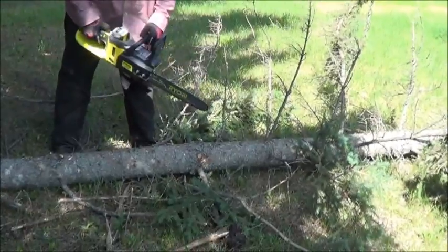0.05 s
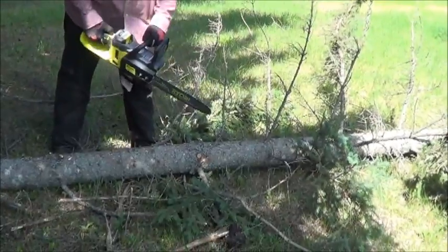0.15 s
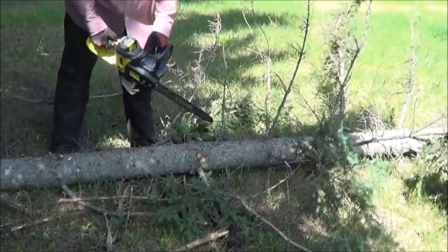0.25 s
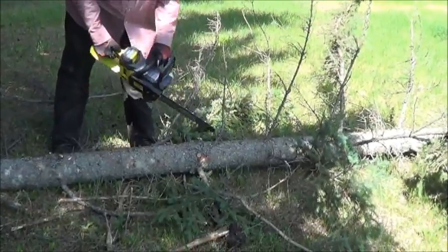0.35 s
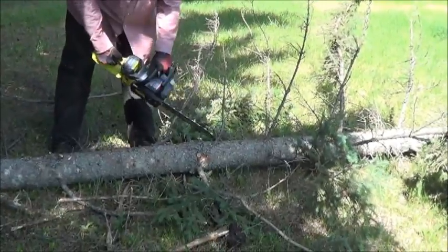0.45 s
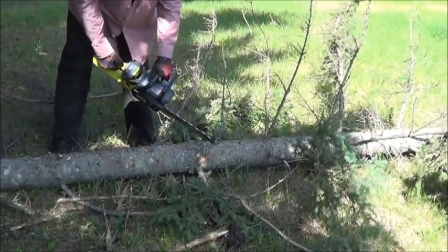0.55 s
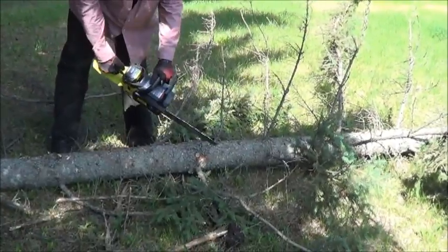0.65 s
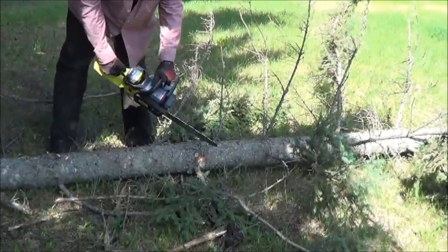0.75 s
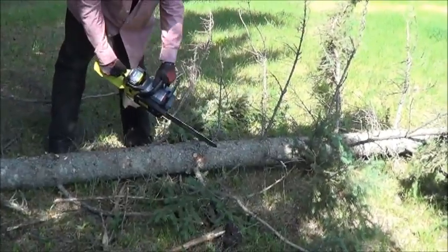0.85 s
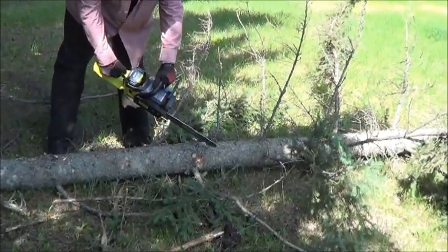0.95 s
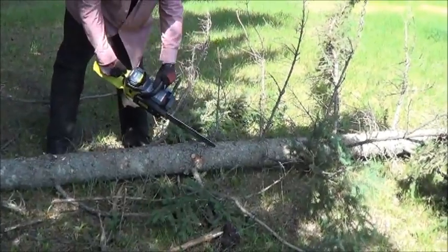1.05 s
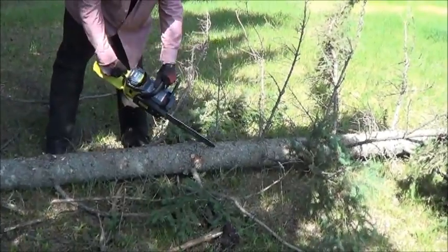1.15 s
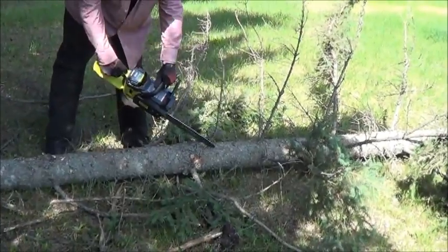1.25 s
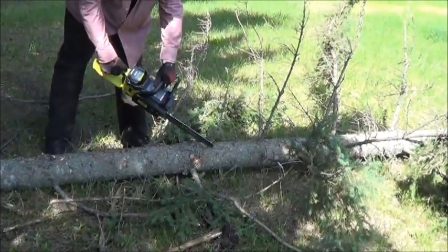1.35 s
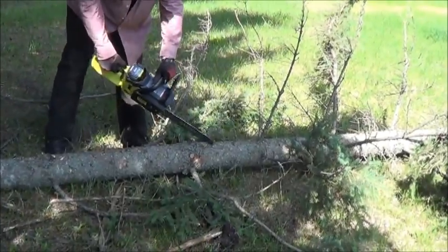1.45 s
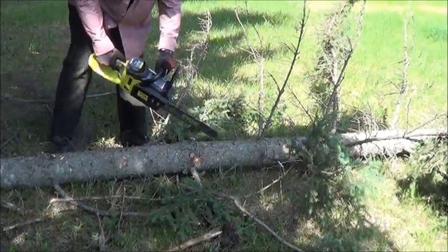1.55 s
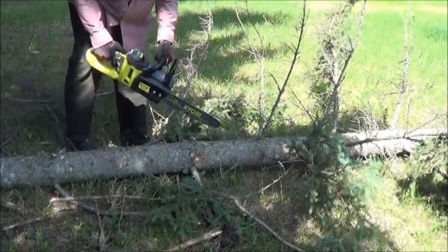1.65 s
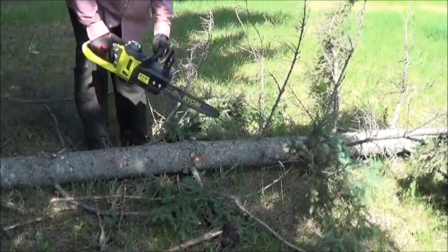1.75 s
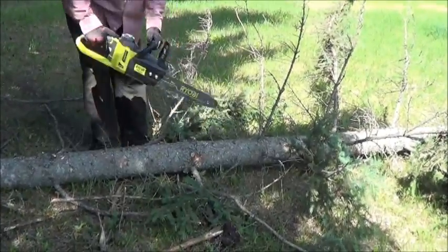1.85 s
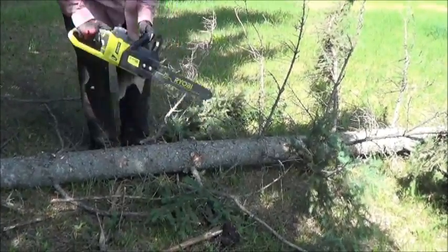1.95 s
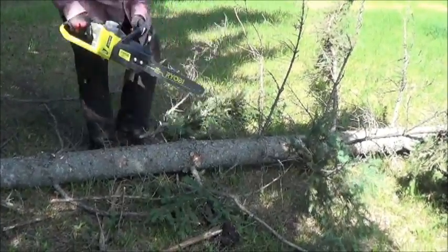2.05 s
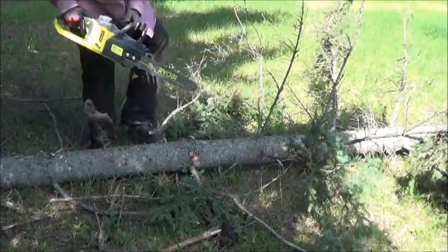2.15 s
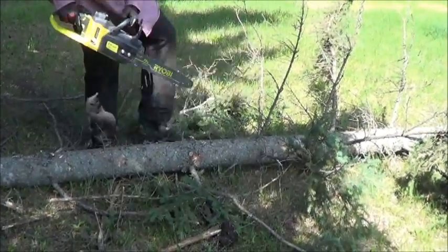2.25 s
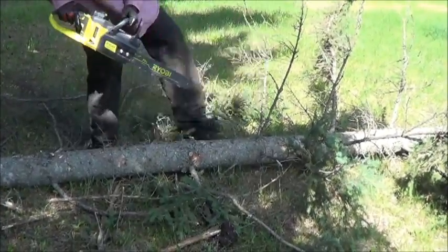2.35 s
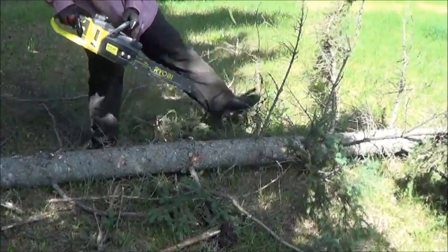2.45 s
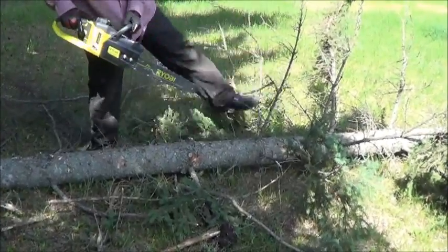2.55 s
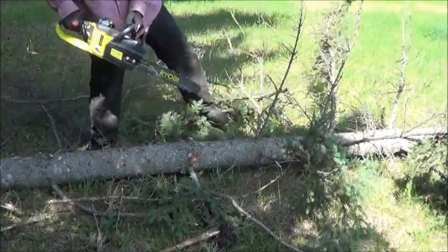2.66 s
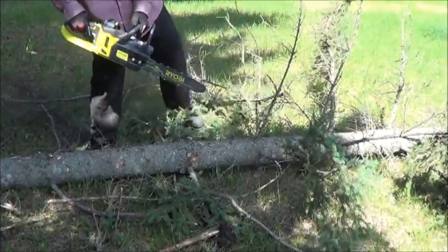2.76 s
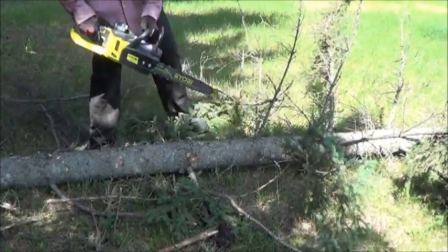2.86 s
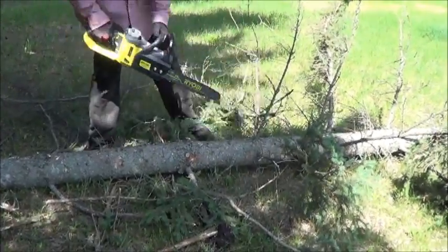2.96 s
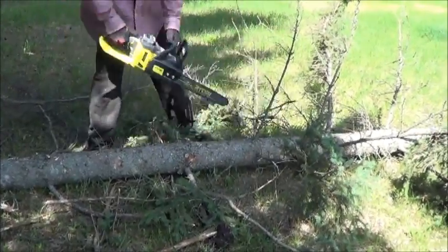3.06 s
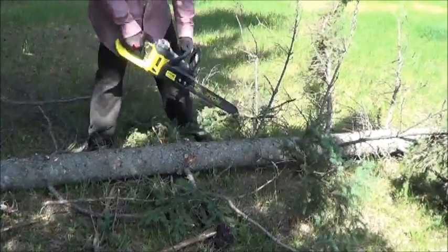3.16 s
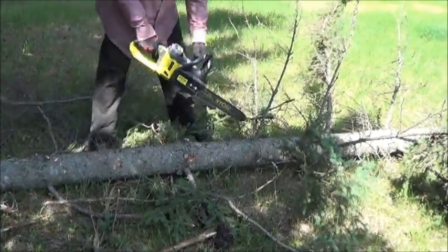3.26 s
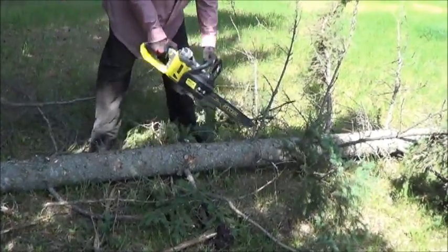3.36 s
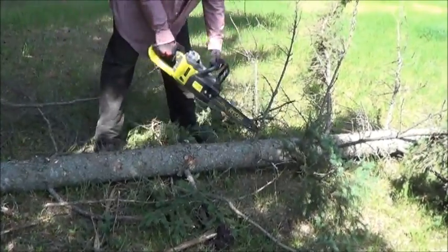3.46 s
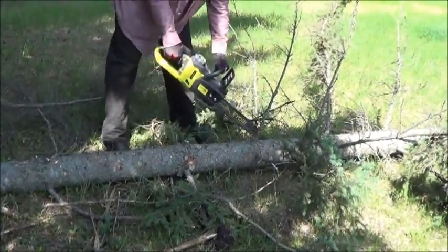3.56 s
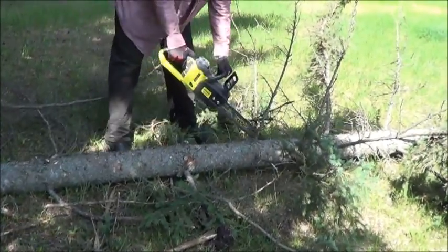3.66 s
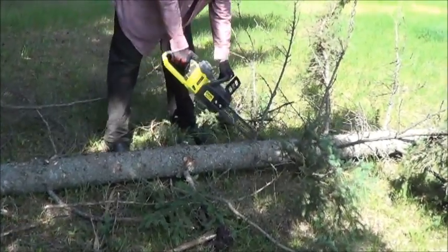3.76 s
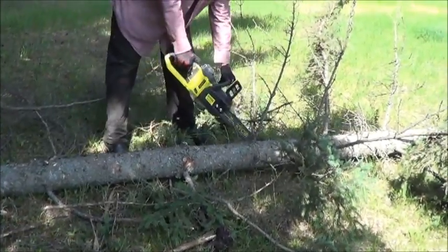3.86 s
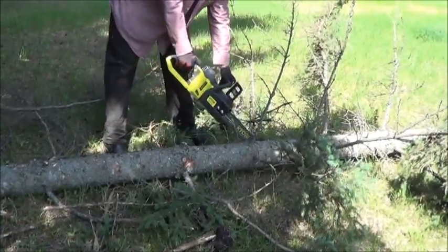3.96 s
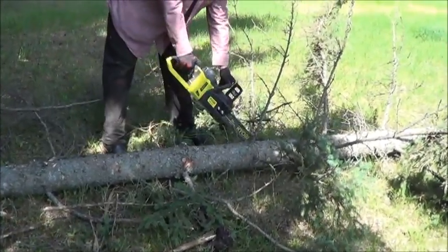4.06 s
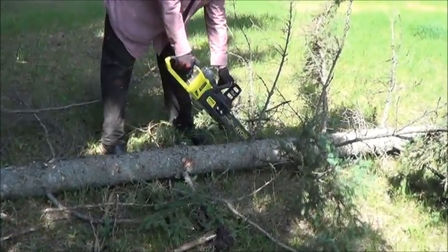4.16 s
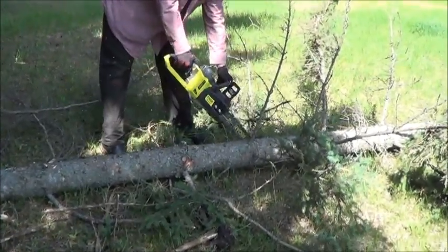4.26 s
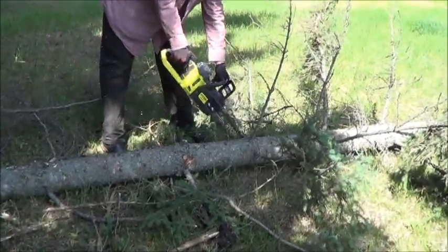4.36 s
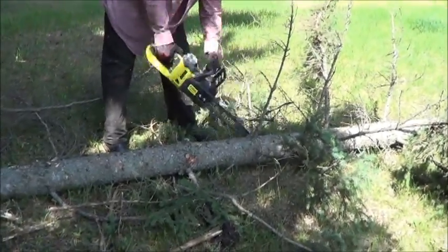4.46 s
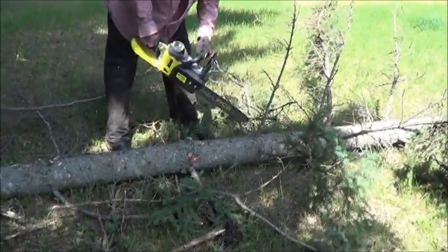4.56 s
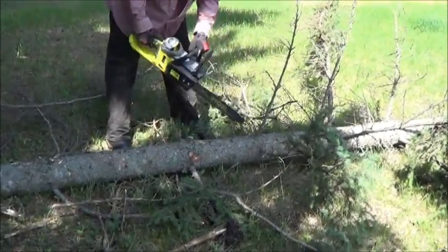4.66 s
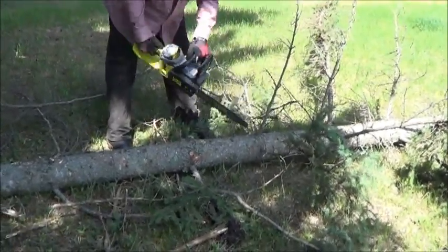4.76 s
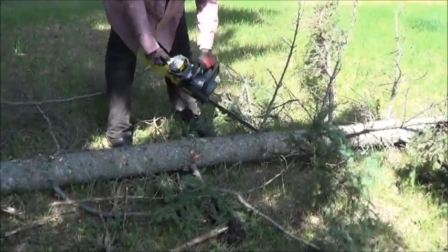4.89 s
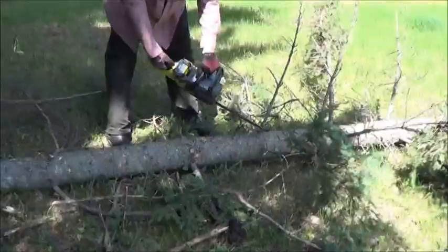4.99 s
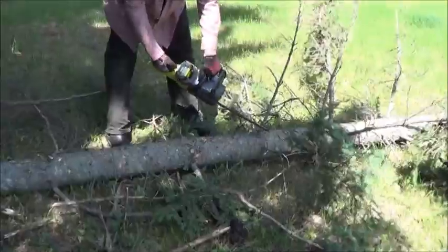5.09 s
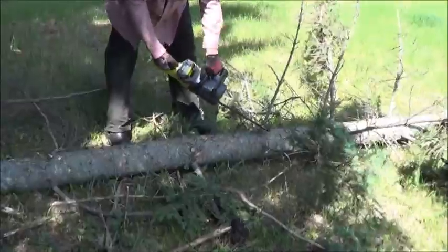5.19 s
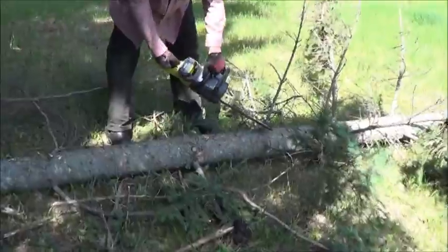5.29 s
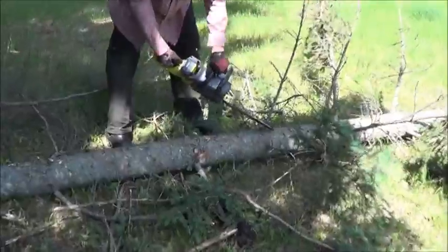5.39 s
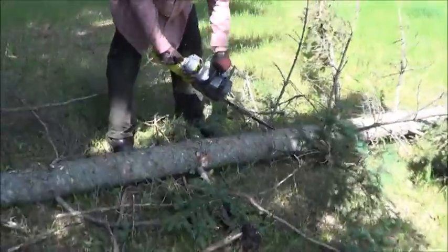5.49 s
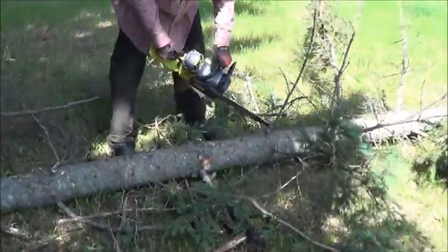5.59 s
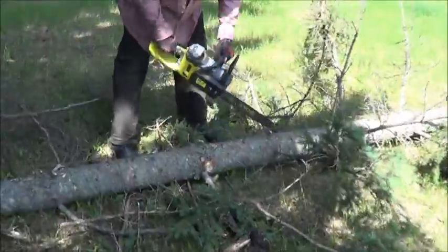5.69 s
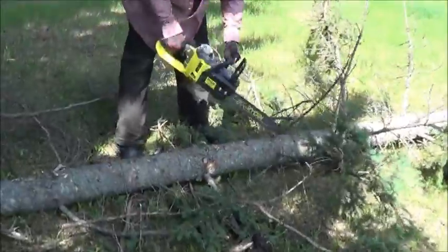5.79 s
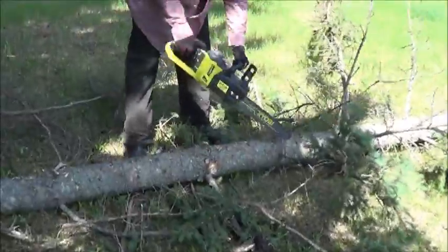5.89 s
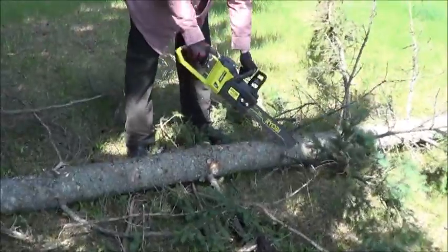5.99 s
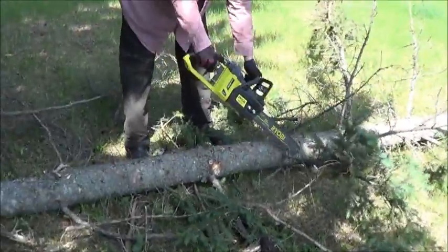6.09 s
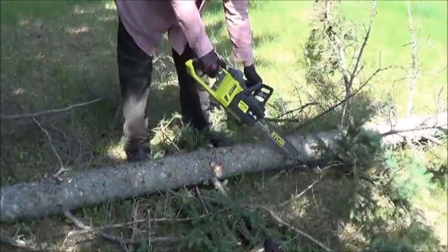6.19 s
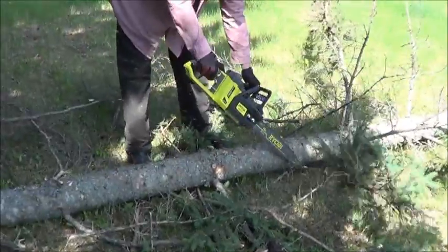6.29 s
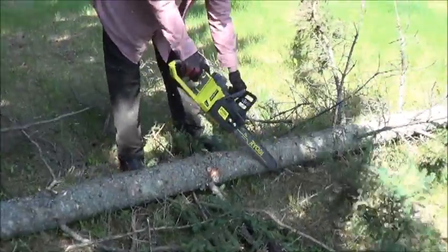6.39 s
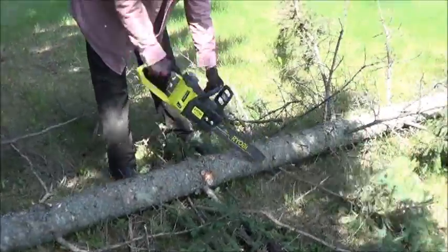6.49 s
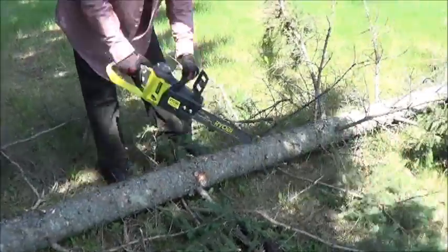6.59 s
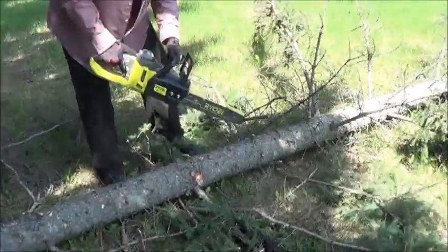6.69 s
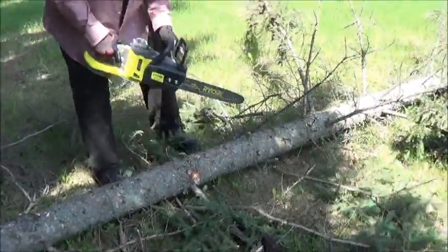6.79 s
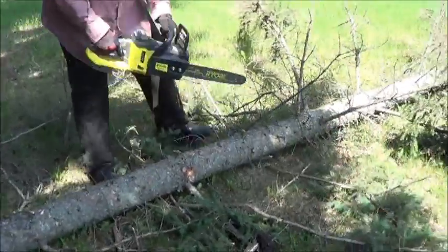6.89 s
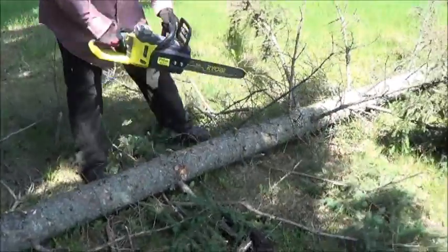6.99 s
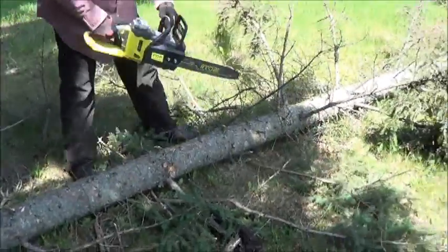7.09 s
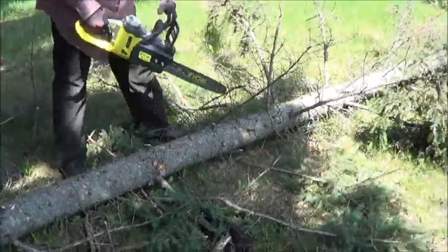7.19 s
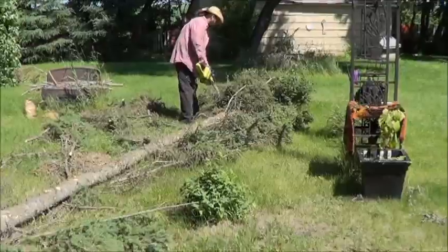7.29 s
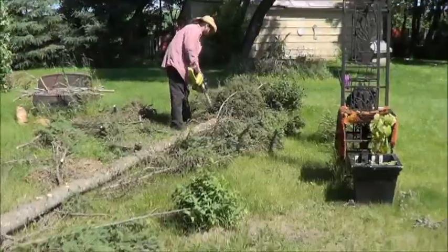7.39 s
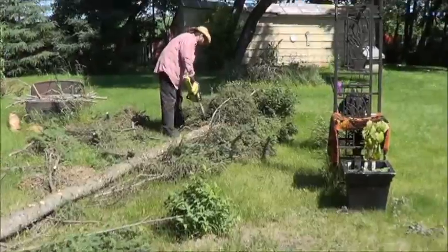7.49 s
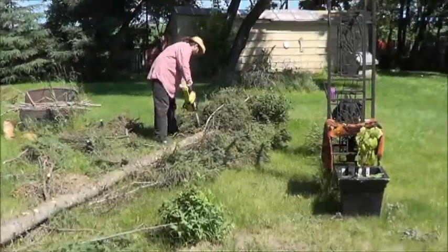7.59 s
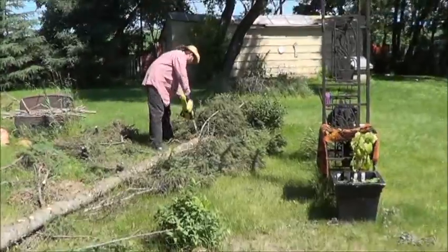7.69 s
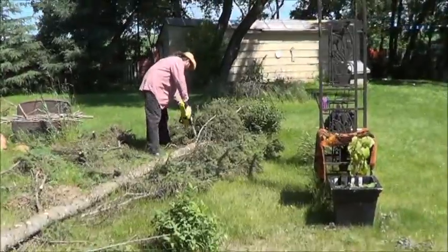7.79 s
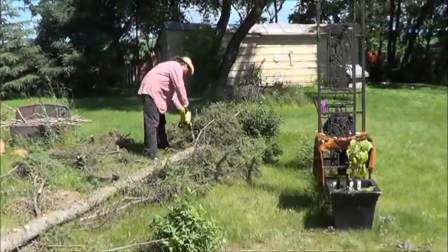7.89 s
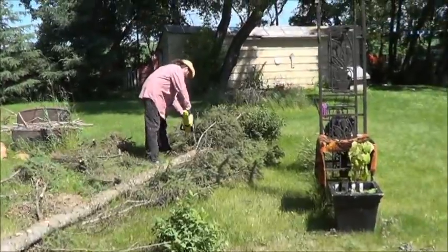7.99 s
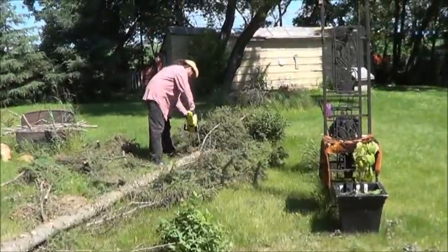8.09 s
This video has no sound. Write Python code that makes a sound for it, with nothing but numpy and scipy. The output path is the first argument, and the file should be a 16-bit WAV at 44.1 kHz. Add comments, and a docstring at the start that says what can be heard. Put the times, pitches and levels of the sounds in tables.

```python
"""A battery chainsaw cuts a felled spruce on a lawn: it spins up, bites, coasts down, then cuts again.
Chain links rattle and hiss (clicks and noise), the sprocket whines and the motor hums (tones that
follow the speed), and the drive whistles at each start. Noise bursts make squeals and knocks.
Faint echoes, a garden hush and wind surround it. Later we jump to a spot farther off, where wind
tugs at the microphone and the saw starts once more. A gain control evens the level."""
import sys
import numpy as np
from scipy import signal
from scipy.fft import rfft, irfft
from scipy.io import wavfile
from scipy.ndimage import uniform_filter1d, map_coordinates

SR = 44100
rng = np.random.default_rng(int(sys.argv[2]) if len(sys.argv) > 2 else 0)


def generate_wav(sig):
    """Save sig (samples, or channels by samples) to the path in sys.argv[1] as 16-bit PCM at SR."""
    pcm = np.round(np.clip(np.atleast_2d(sig).T, -1, 1) * 32767).astype(np.int16)
    wavfile.write(sys.argv[1], SR, pcm)


N = 358974
TIME = np.arange(N) / SR   # s
FREQS = np.maximum(np.arange(N // 2 + 1) * SR / N, 1)   # Hz
JUMP_S = 7.309   # from here on we listen from farther off
FAR_OFF = TIME >= JUMP_S

# Motor. When the trigger is held: (pressed [s], released [s])
PULLS = [(0.442, 1.672), (3.442, 6.618), (7.578, 8.2)]
SPIN_UP_TURNS_PER_S2 = 224   # soft start of the drive
FRICTION_TURNS_PER_S2, DRAG_PER_S = 37, 0.935   # what slows the coasting chain
FULL_SPEED = 190   # turns per s
# Top shaft speed that the load allows during each pull: (time [s], speed [turns per s])
FIRST_CUT = [(0.89, 99), (0.994, 117), (1.102, 129), (1.202, 138.8), (1.238, 137.9), (1.62, 159),
             (1.68, 156)]
SECOND_CUT = [(3.92, 106.8), (3.99, 119.4), (4.05, 125.6), (4.18, 128.1), (4.36, 122.0), (4.51, 149.4),
              (4.57, 155.2), (4.77, 161.9), (4.99, 175.6), (5.08, 179.2), (5.41, 180.9), (5.51, 167.5),
              (5.64, 178.5), (5.7, 180.1), (6.32, 179.7), (6.39, 170.2), (6.49, 177.6), (6.62, 180.2)]
THIRD_CUT = [(8.02, 98.7), (8.14, 116.5)]
# When the cutters bite into wood: (start [s], end [s], depth [0-1])
BITES = [(1.19, 1.31, 0.8), (4.08, 4.42, 0.64), (5.43, 5.59, 1.0), (6.32, 6.48, 0.76)]
BITE_EDGE_S = 0.07   # time to sink in or come out

TEETH, LINKS = 6, 52   # teeth on the sprocket, links in the chain
# Chain noise, one row each for housing boom, rattle, rasp and hiss: (top level [dB],
# slope [dB per doubling of speed], speed where it levels off [turns per s],
# change while speeding up [dB], change in a bite [dB], change at the far spot [dB])
CHAIN_NOISE = [(-25.7, 3.4, 48, 7.0, 0.8, -9), (-17.2, 4.4, 95, 4.6, -2.5, -5),
               (-13.9, 7.5, 118, 4.0, -0.5, -5.3), (-5.0, 6.5, 185, 1.5, 0.6, 1.8)]
# Frequencies that divide boom, rattle, rasp and hiss: (frequency [Hz])
BAND_EDGES = [1000, 2500, 7000]
SLACK_FLUTTER_DB, SLACK_SPEED = 1.2, 40   # a slow chain hangs loose and flaps more (dB, turns per s)
# Tone colour of the saw from each spot: (frequency [Hz], relative level [dB])
NEAR_COLOUR = [(230, -23), (330, -13), (450, -13), (660, 11), (870, 4.5), (1120, 7), (1400, 11.5),
               (2000, 12.5), (2650, 3.5), (3000, 3), (3550, 7.5), (4800, 3.5), (7500, 8.5), (10900, 13.5),
               (13000, 8.5), (15700, -2)]
FAR_COLOUR = [(300, -20), (560, 1), (720, 13), (900, 2), (1250, 6.5), (2100, 0.5), (2700, -3.5),
              (3700, -0.5), (6000, -3), (8500, 8.5), (11300, 16.5), (13000, 14), (15700, 6)]

# The whine and its overtones: (multiple of the tooth rate, relative level [dB])
WHINE_TONES = [(1, -1.5), (2, -1), (3, -3.5), (4, -6)]
# The chain seats on the sprocket above WHINE_SETS_IN (turns per s)
WHINE_DB, WHINE_SETS_IN, WHINE_DB_PER_DOUBLING = 0.5, 74, 1.5
WHINE_BITE_DB, WHINE_FAR_DB = -14, -17   # wood damps the whine; distance weakens it
# Moments when the whine's level changes smoothly:
# (middle [s], length [s], change at the tooth rate [dB], change at its double [dB])
WHINE_SWELLS = [(1.04, .35, 0, 6), (1.97, .25, 4.5, -4), (2.27, .25, 0, 14), (3.99, .26, 4.5, 0),
                (4.6, .35, -2, 4), (5.15, 1.0, 5.5, -3), (6.07, .6, 2.5, 3.5), (6.9, .8, -4.5, 1),
                (7.28, .16, 0, 7)]
# Housing resonances that the whine glides through: (frequency [Hz], gain [dB])
HOUSING = [(300, -33), (420, -35), (520, -32), (600, -15.5), (672, -7.5), (740, -15.5), (800, -23),
           (890, -16), (950, -22.5), (1005, -14.5), (1090, -20.5), (1210, -19.5), (1420, -14),
           (1520, -19.5), (1650, -16), (1880, -11.5), (2010, -23), (2160, -17.5), (2400, -31), (3300, -24),
           (4300, -22)]
# Weaker tones of the turning shaft: (multiple of the shaft rate, relative level [dB])
SHAFT_TONES = [(2, -11), (3, -9), (4, -11.5), (7, -19.5), (8, -13), (9, -14.5), (13, -16)]

HUM_DB, HUM_EFFORT_DB = -30.5, 9.5   # magnetic hum running free, and its rise under full effort
HUM_DB_PER_DOUBLING, HUM_FAR_DB = 4.0, -12
FULL_EFFORT = 0.25   # share of the soft start's acceleration
DRIVE_HZ, DRIVE_ORDER = 10000, 14   # switching tone; steps per shaft turn

# The chain chirps on the bar, and the bar rings as it bites:
# (middle [s], length [s], frequency [Hz], width [Hz], level [dB])
SQUEALS = [(1.3, 0.9, 3650, 600, -23.5), (1.728, 0.32, 6500, 830, -15), (2.685, 0.1, 12700, 400, -28),
           (4.05, 0.9, 1880, 338, -14), (4.2, 0.75, 830, 280, -15), (4.3, .7, 4050, 700, -21.5),
           (4.572, 0.12, 12100, 300, -18), (4.721, 0.37, 6530, 1100, -18), (5.875, 0.21, 6680, 900, -14),
           (5.94, .09, 12100, 350, -14), (7.75, .2, 1400, 900, -24), (8.01, .14, 1140, 260, -21)]
# Handling clicks, twigs and thuds:
# (time [s], level [dB], frequency [Hz], width [octaves], decay [s])
KNOCKS = [(0.223, -19.5, 1200, 1.2, 0.0049), (0.2292, -19, 1370, 1.3, 0.0048),
          (0.2707, -18.5, 6940, 7.4, .003), (2.31, -28, 201, 0.44, 0.015), (2.537, -17, 8000, 1.99, .002),
          (2.868, -24, 1400, 2.14, 0.0078), (3.176, -21, 9030, 0.74, 0.0037),
          (3.328, -28, 9000, 0.61, 0.0043), (7.325, -12, 178, 0.65, 0.0063),
          (7.464, -18.5, 160, 1.5, 0.016)]
# A click and a snatch of the chain at each start heard close by:
# (time after the trigger [s], level [dB], frequency [Hz], width [octaves], decay [s])
START_KNOCKS = [(-0.002, -18, 9600, 0.55, 0.0022), (0.024, -22, 785, 0.78, 0.008)]

# Tone colours of the garden hush and of the wind: (frequency [Hz], relative level [dB])
HUSH_COLOUR = [(60, -9.5), (250, -9), (450, 0.5), (720, 1.5), (1300, -1.5), (2600, -9.5), (5000, -11),
               (9000, -12), (15500, -25)]
WIND_COLOUR = [(20, -17), (50, -18), (90, -0.5), (150, 2), (280, -1.5), (500, -12), (1500, -57)]
HUSH_NEAR_DB, HUSH_FAR_DB = -38, -31
WIND_NEAR_DB, WIND_FAR_DB = -60.5, -40.5   # steady wind, before the gusts
# Gusts on the microphone: (middle [s], length [s], level [dB])
GUSTS = [(0.3, 1.6, -46), (7.61, .24, -27.5), (8.118, 0.32, -32)]

CEILING_DB, SQUEEZE = -12.5, 0.89   # gain control: threshold, share of the excess taken away
RECOVERY_DB_PER_S, GAIN_ATTACK_S = 24.5, 0.011
CUTOFF_HZ = 16000


def motor():
    """Shaft speed and power on/off: pulls ramp up to the load's limit; friction and drag stop the chain."""
    speed, powered = np.zeros(N), np.zeros(N)
    offset = FRICTION_TURNS_PER_S2 / DRAG_PER_S
    for (on, off), load in zip(PULLS, (FIRST_CUT, SECOND_CUT, THIRD_CUT)):
        limit = np.interp(TIME, *np.transpose(load))
        driven = np.minimum(SPIN_UP_TURNS_PER_S2 * (TIME - on), limit)
        release_speed = np.interp(off, TIME, driven)
        coasting = (release_speed + offset) * np.exp(-DRAG_PER_S * (TIME - off)) - offset
        same_spot = FAR_OFF == (on > JUMP_S)
        speed = np.maximum(speed, np.where(TIME < off, driven, coasting) * same_spot)
        powered += (TIME > on) & (TIME < off)
    return speed, uniform_filter1d(powered, size=1500)


def speeding_up(speed):
    """Acceleration as a share of the soft start's, 0-1."""
    share = np.gradient(speed) * SR / SPIN_UP_TURNS_PER_S2
    return uniform_filter1d(np.clip(share, 0, 1), size=2000)


def biting():
    """How deep the cutters are in the wood, 0-1."""
    depth_now = np.zeros(N)
    for start, end, depth in BITES:
        inside_s = np.minimum(TIME - start, end - TIME)
        depth_now += depth * np.clip(inside_s / BITE_EDGE_S + 0.5, 0, 1)
    return depth_now


def chain_levels(speed, surge, bite):
    """Boom, rattle, rasp and hiss in dB: they grow with speed and change in a snatch or a bite."""
    moving_db = 20 * np.log10(np.clip(speed / 1.5, 0.01, 1))   # hushed when almost still
    snatch = surge * (1 - np.exp(-2 * speed / SLACK_SPEED))   # the slack is taken up first
    levels = []
    for top_db, slope, levels_off, surge_db, bite_db, far_db in CHAIN_NOISE:
        level_db = top_db + moving_db + by_speed(speed, slope, levels_off)
        levels.append(level_db + surge_db * snatch + bite_db * bite + far_db * FAR_OFF)
    return levels


def link_clicks(speed, scatter, count=5):
    """Links click at places round the bar, each with its own play, so the pattern returns once a lap."""
    travel = np.cumsum(TEETH * speed) / SR   # in links
    out = np.zeros(N)
    for _ in range(count):
        place = rng.random()
        play, chance = rng.standard_normal(LINKS), rng.standard_normal(8000)
        link = (travel + place).astype(int)
        at = np.flatnonzero(np.diff(link))   # a new link arrives
        out[at] += play[link[at] % LINKS] + scatter * chance[link[at] % len(chance)]
    return rms_one(out / np.sqrt(speed + 10))


def chain(speed, levels, colour, scatter, scrape, gate, flutter_db, flicker_db):
    """Link clicks shake the housing; steel sliding in the bar adds hiss that pulses with the teeth."""
    clicks = link_clicks(speed, scatter)
    teeth = np.cos(2 * np.pi * TEETH * np.cumsum(speed) / SR)
    sliding = rng.standard_normal(N) * (1 + gate * teeth)
    struck = rfft(clicks + scrape * sliding)
    rubbed = rfft(0.33 * clicks + sliding)
    # the slack chain flaps against the bar
    slap_db = flutter_db * drift(120) + 0.58 * drift(4.7)
    slap_db = slap_db + SLACK_FLUTTER_DB * np.exp(-speed / SLACK_SPEED) * drift(35)
    # what lies below each edge; neighbours subtracted give the four bands
    below = [0] + [1 / (1 + (FREQS / hz) ** 16) for hz in BAND_EDGES] + [1]
    shape = gain_at(colour, FREQS)
    out = np.zeros(N)
    for k, (level_db, drive) in enumerate(zip(levels, (struck, struck, rubbed, rubbed))):
        band = rms_one(irfft(drive * shape * (below[k + 1] - below[k]), N))
        out += band * from_db(level_db + slap_db + flicker_db * drift(16.7))
    return out


def whine(speed, bite, rattle_db, waver_db, wobble, shaft_db, shaft_waver_db, slow_db):
    """Sprocket teeth mesh with the chain and excite housing resonances; weaker shaft tones join in."""
    angle = 2 * np.pi * np.cumsum(speed) / SR + wobble * drift(24)
    seated = 1 / np.sqrt(1 + (WHINE_SETS_IN / (speed + 1)) ** 10)
    mesh_db = WHINE_DB + by_speed(speed, WHINE_DB_PER_DOUBLING, FULL_SPEED)
    mesh_db = mesh_db + WHINE_BITE_DB * bite + WHINE_FAR_DB * FAR_OFF
    swells_db = np.zeros((len(WHINE_TONES), N))
    for s, length, first_db, second_db in WHINE_SWELLS:
        swells_db[0] += first_db * swell(s, length)
        swells_db[1] += second_db * swell(s, length)
    out = np.zeros(N)
    for k, ((_, db), swell_db) in enumerate(zip(WHINE_TONES, swells_db), 1):
        level = from_db(mesh_db + db + swell_db + waver_db * drift(12.6))
        level = level * seated ** k * gain_at(HOUSING, k * TEETH * speed)   # overtones set in last
        out += level * np.sin(k * TEETH * angle)
    unbalance_db = rattle_db + shaft_db - slow_db * (1 - speed / FULL_SPEED)   # grows with speed
    for order, db in SHAFT_TONES:
        tone = np.sin(order * angle + rng.uniform(0, 2 * np.pi))
        level = from_db(unbalance_db + db + shaft_waver_db * drift(14.3))
        out += tone * level * gain_at(NEAR_COLOUR, order * speed) * ~FAR_OFF
    return np.sqrt(2) * out


def motor_hum(speed, effort, waver_db, cogging_db, top_hz):
    """Magnets pull once per pole and cog three times as fast; the housing passes little above top_hz."""
    angle = 2 * np.pi * np.cumsum(speed) / SR + 0.0088 * drift(25)
    out = np.zeros(N)
    for order, db in ((DRIVE_ORDER, 0), (3 * DRIVE_ORDER, cogging_db)):
        hz = order * speed
        passed = np.minimum(hz / 800, 1) ** 4 / (1 + (hz / top_hz) ** 20)
        out += passed * from_db(db + waver_db * drift(9.5)) * np.sin(order * angle)
    level_db = HUM_DB + HUM_EFFORT_DB * effort + HUM_FAR_DB * FAR_OFF
    level_db = level_db + by_speed(speed, HUM_DB_PER_DOUBLING, FULL_SPEED)
    return np.sqrt(2) * from_db(level_db) * out


def drive_whistle(speed, level_db, ring_hz, width_hz, far_db):
    """A sideband of the drive's switching tone climbs through a motor resonance as the saw speeds up."""
    hz = DRIVE_HZ + DRIVE_ORDER * speed
    rising = uniform_filter1d(1.0 * (np.gradient(speed) * SR > 60), size=900)
    resonance = 1 / np.sqrt(1 + (2 * (hz - ring_hz) / width_hz) ** 2)
    duty = np.clip((speed + 1.5) / 115, 0, 1)
    ripple = 4 * duty * (1 - duty)   # dies out as the drive opens fully
    level = ripple * from_db(level_db + far_db * (TIME > JUMP_S) + 2.8 * drift(46))
    tone = np.sin(2 * np.pi * np.cumsum(hz) / SR + 0.25 * drift(150))
    return level * rising * resonance * tone


def squeals():
    """Steel rings on steel: narrow bands of noise that swell and fade."""
    out = np.zeros(N)
    for s, length, hz, width, db in SQUEALS:
        size, at = int(length * SR), int((s - length / 2) * SR)
        ring = band_noise(hz - width / 2, hz + width / 2, size)
        out[at:at + size] += from_db(db) * np.hanning(size) * ring
    return out


def knocks(size=6000):
    """Clicks and thuds: short bursts of noise that die away fast."""
    out, age = np.zeros(N), np.arange(size) / SR
    near_pulls = [on for on, _ in PULLS if on < JUMP_S]
    starts = [(on + delay, *sound) for on in near_pulls for delay, *sound in START_KNOCKS]
    for s, db, hz, octaves, decay in KNOCKS + starts:
        fade = np.exp(-age / decay) * (1 - np.exp(-age * hz))
        half_width = 2 ** (octaves / 2)
        at = int(s * SR)
        out[at:at + size] += from_db(db) * fade * band_noise(hz / half_width, hz * half_width, size)
    return out


def ground_echo(x, lag_s, sway, strength):
    """Log and ground return a copy; its delay sways with the saw, so ripples wander in the spectrum."""
    lag = lag_s * (1 + sway * drift(0.514))
    echo = map_coordinates(x, [(TIME - lag) * SR], order=3)
    return (x + strength * echo) / np.sqrt(1 + strength ** 2)


def garden(x, level_db, decay_s, dull_hz, size=9000):
    """Trunks and ground scatter the sound: faint, dull, fading echoes, different for each ear."""
    age = np.arange(size) / SR
    echoes = rng.standard_normal((2, size)) * np.exp(-age / decay_s) * (age > 0.003)
    echoes = echoes / np.sqrt(np.sum(echoes ** 2) / 2)
    dull = signal.butter(1, min(dull_hz, SR / 3), fs=SR, output="sos")
    echoes = signal.sosfilt(dull, echoes)
    return x + from_db(level_db) * signal.fftconvolve(x[None], echoes, axes=1)[:, :N]


def air(hush_side, wind_side, lumps_db):
    """Garden hush and lumpy, gusting wind: coloured noise, partly different left and right."""
    hush = from_db(np.where(FAR_OFF, HUSH_FAR_DB, HUSH_NEAR_DB))
    wind = from_db(np.where(FAR_OFF, WIND_FAR_DB, WIND_NEAR_DB))
    for s, length, db in GUSTS:
        wind = wind + from_db(db) * swell(s, length)
    out = np.zeros((2, N))
    for level, colour, side, rough_db in ((hush, HUSH_COLOUR, hush_side, 0.7),
                                          (wind, WIND_COLOUR, wind_side, lumps_db)):
        mid = coloured(rng.standard_normal(N), colour)
        across = coloured(rng.standard_normal(N), colour)
        sides = mid + side * across * [[1], [-1]]
        out += level * from_db(rough_db * drift(29)) * sides
    return out


def from_db(db):
    """Decibels to gain."""
    return 10 ** (np.asarray(db) / 20)


def rms_one(x):
    """Scale to an average strength (rms) of 1."""
    return x / np.sqrt(np.mean(x ** 2) + 1e-20)


def swell(s, length):
    """A smooth rise and fall around a moment; top 1."""
    return np.cos(np.pi * np.clip((TIME - s) / length, -0.5, 0.5)) ** 2


def by_speed(speed, db_per_doubling, levels_off):
    """Level in dB that grows with speed and then levels off."""
    return -db_per_doubling / 2 * np.log2(1 + (levels_off / (speed + 0.5)) ** 2)


def gain_at(colour, hz):
    """Gain of a tone colour, falling away steeply below its first point."""
    at, db = np.transpose(colour)
    gain = from_db(np.interp(np.log(hz + 1), np.log(at), db))
    return gain * np.minimum(hz / at[0], 1) ** 2


def coloured(x, colour):
    """Give a signal a tone colour; rms 1."""
    return rms_one(irfft(rfft(x) * gain_at(colour, FREQS), N))


def drift(rate):
    """A smooth random curve that wanders faster at a higher rate [Hz]; spread 1."""
    r = np.exp(-40 * np.pi * rate / SR)   # made at a twentieth of the sample rate
    noise = rng.standard_normal(N // 20 + 2002)
    slow = signal.lfilter([1], [1, -2 * r, r * r], noise)[2000:]   # skip the filter's start
    return np.interp(np.arange(N) / 20, np.arange(len(slow)), rms_one(slow))


def band_noise(low_hz, high_hz, size):
    """A stretch of noise between two frequencies; rms 1."""
    sos = signal.butter(2, [low_hz, min(high_hz, SR / 2 - 1000)], "band", fs=SR, output="sos")
    return rms_one(signal.sosfilt(sos, rng.standard_normal(size + 4000))[4000:])


def gain_control(x):
    """Turns loud sound down quickly and recovers slowly."""
    power = uniform_filter1d(np.mean(x ** 2, axis=0), size=1000)
    level_db = 10 * np.log10(power + 1e-12)
    cut_db = SQUEEZE * np.maximum(level_db - CEILING_DB, 0)
    recovery_db = RECOVERY_DB_PER_S * TIME
    held_db = np.maximum.accumulate(cut_db + recovery_db) - recovery_db
    keep = np.exp(-1 / (GAIN_ATTACK_S * SR))
    return x * from_db(-signal.lfilter([1 - keep], [1, -keep], held_db))


def scene():
    """The saw close by, then from farther off, in the open air."""
    speed, powered = motor()
    bite, surge = biting(), speeding_up(speed)
    levels = chain_levels(speed, surge, bite)
    near = chain(speed, levels, NEAR_COLOUR, scatter=0.5, scrape=0.95, gate=0.28,
                 flutter_db=0.69, flicker_db=0.73) * ~FAR_OFF
    far = chain(speed, levels, FAR_COLOUR, scatter=0.73, scrape=0.76, gate=0.27,
                flutter_db=1.1, flicker_db=0.6) * FAR_OFF
    rattle = ground_echo(near + far, lag_s=0.0022, sway=0.123, strength=0.25)
    tones = whine(speed, bite, levels[1], waver_db=2.5, wobble=0.019,
                  shaft_db=-7.5, shaft_waver_db=3.5, slow_db=3.5)
    effort = np.minimum(surge / FULL_EFFORT, 1)
    hum = powered * motor_hum(speed, effort, waver_db=4.0, cogging_db=2.5, top_hz=2720)
    whistle = drive_whistle(speed, level_db=-7.0, ring_hz=10724, width_hz=170, far_db=1.0)
    saw = rattle + tones + hum + whistle + squeals() + knocks()
    outdoors = garden(saw, level_db=-18, decay_s=0.027, dull_hz=8000)
    return outdoors + air(hush_side=0.33, wind_side=0.55, lumps_db=2.0)


def record(dry):
    """Gain control evens the level, tall peaks are rounded off at full scale and the top is cut."""
    even = gain_control(dry)
    rounded = even / (1 + even ** 16) ** (1 / 16)
    return irfft(rfft(rounded) / (1 + (FREQS / CUTOFF_HZ) ** 400), N)


dry = scene()
out = record(dry)
generate_wav(out)
```